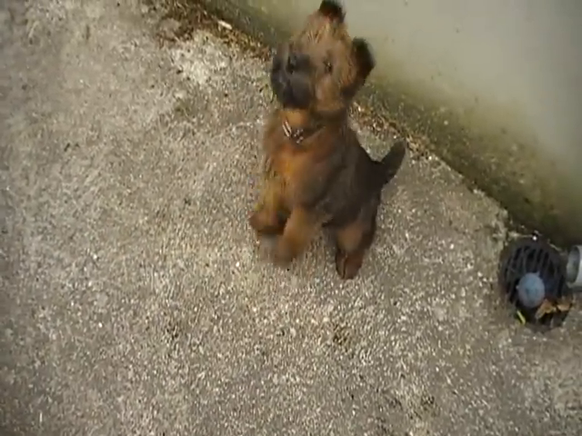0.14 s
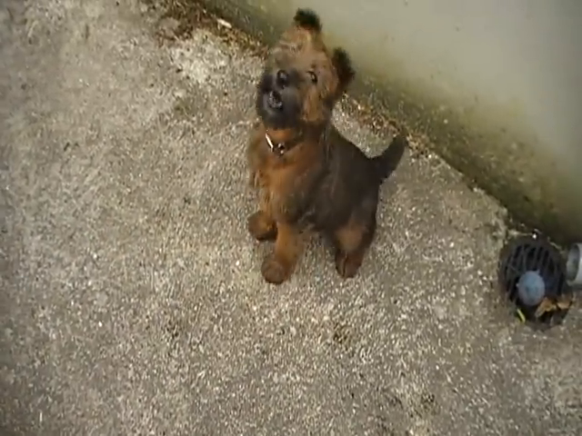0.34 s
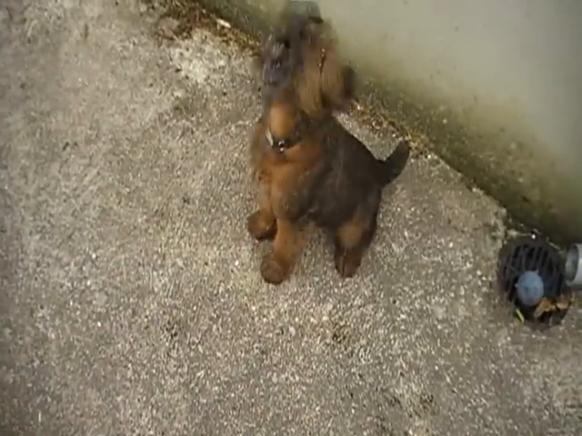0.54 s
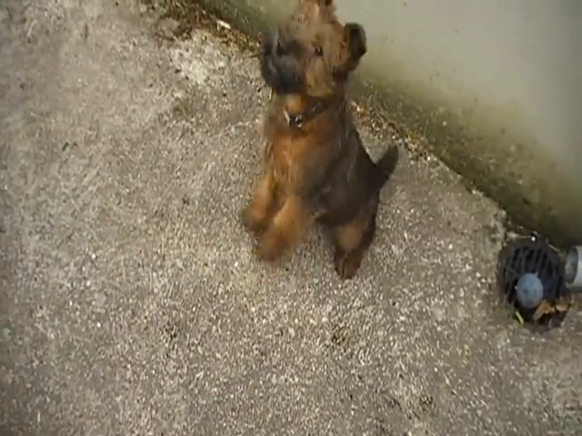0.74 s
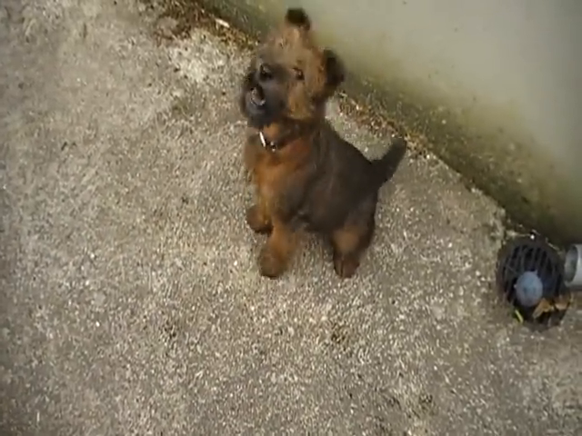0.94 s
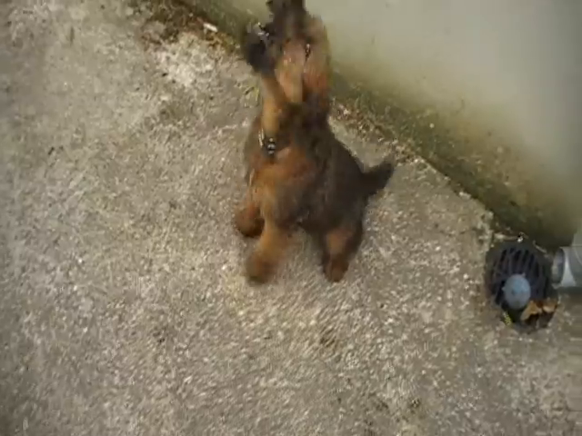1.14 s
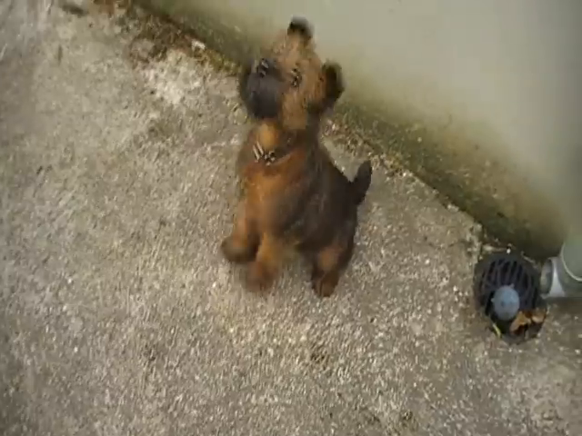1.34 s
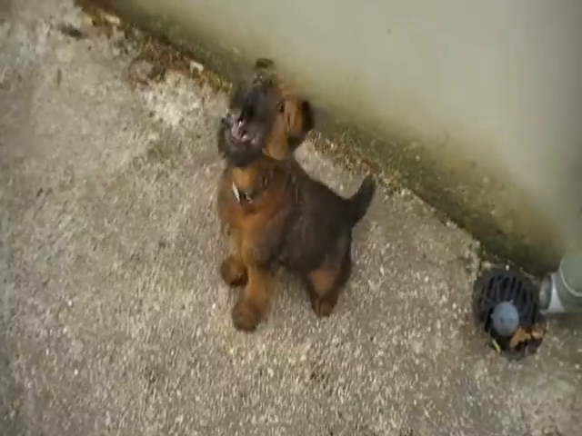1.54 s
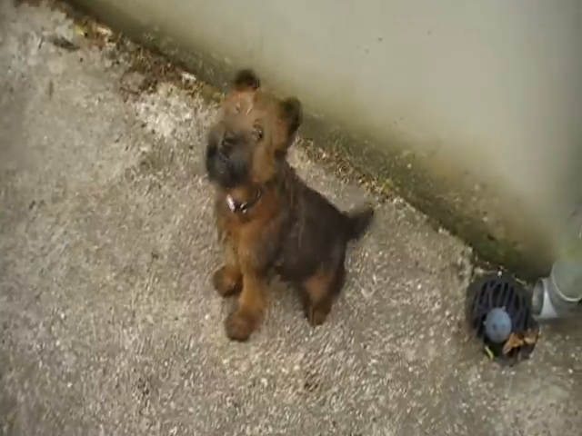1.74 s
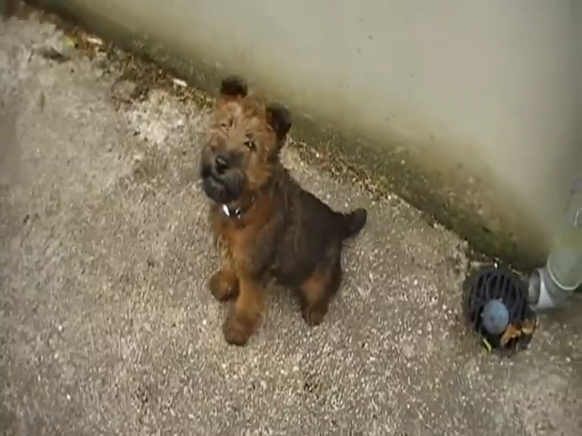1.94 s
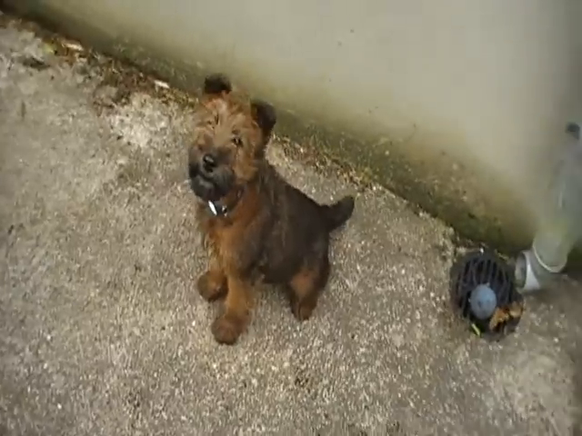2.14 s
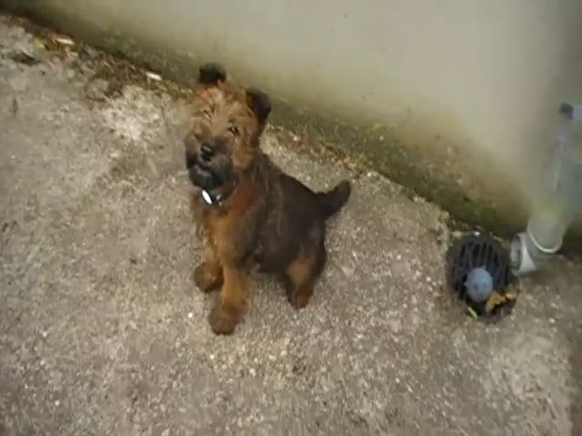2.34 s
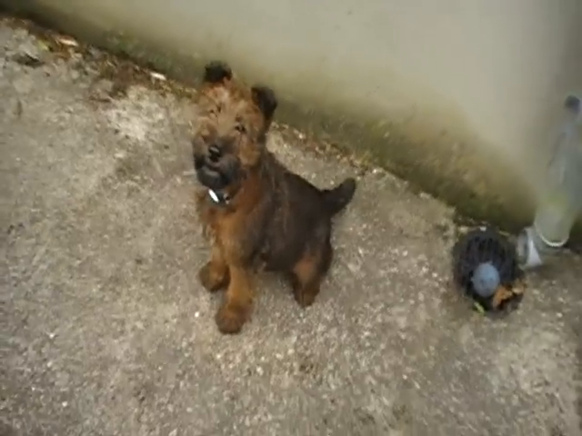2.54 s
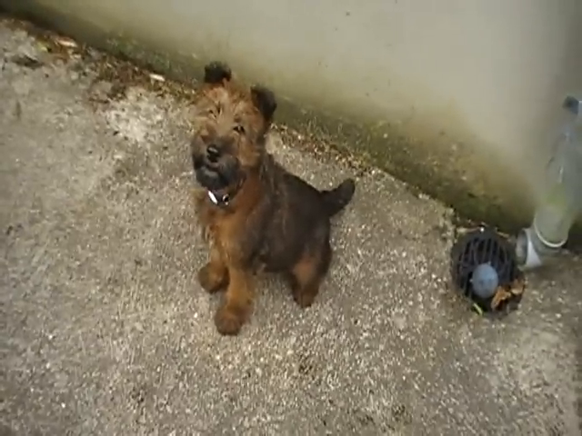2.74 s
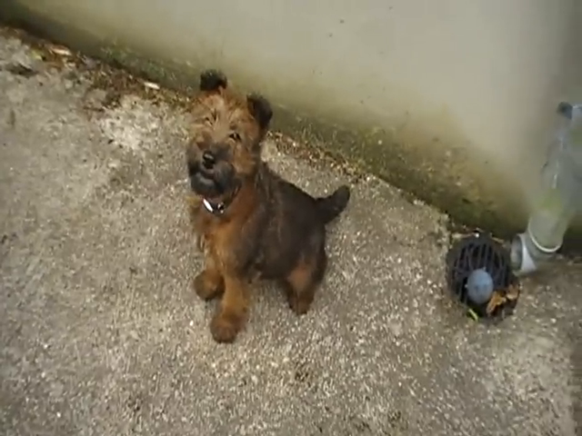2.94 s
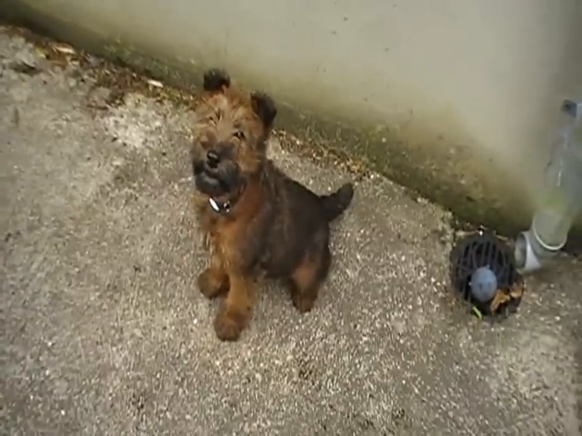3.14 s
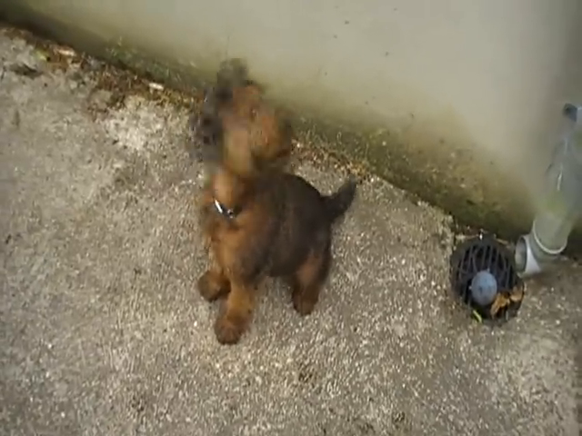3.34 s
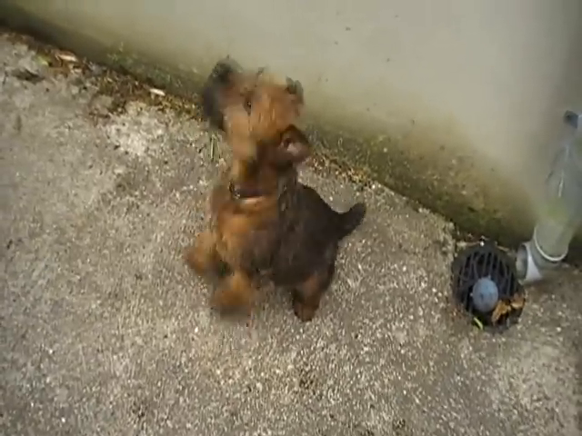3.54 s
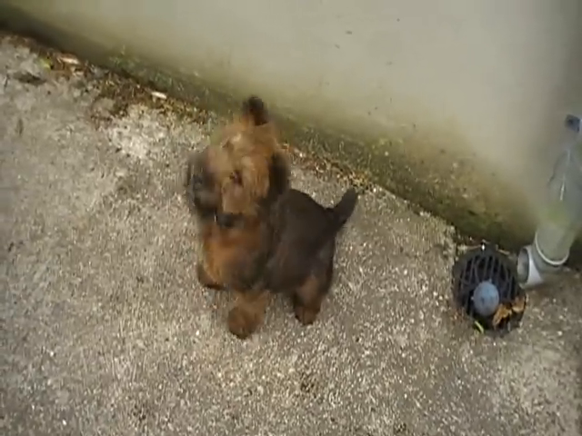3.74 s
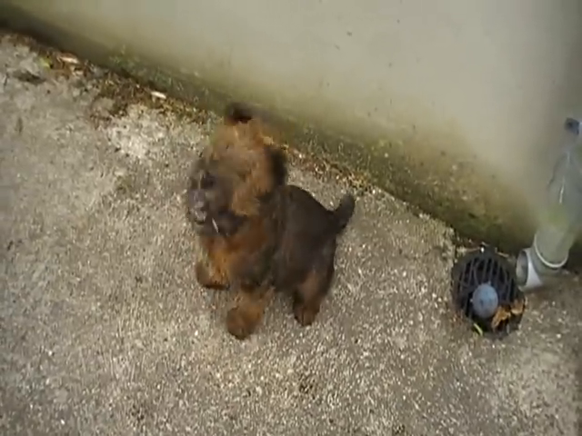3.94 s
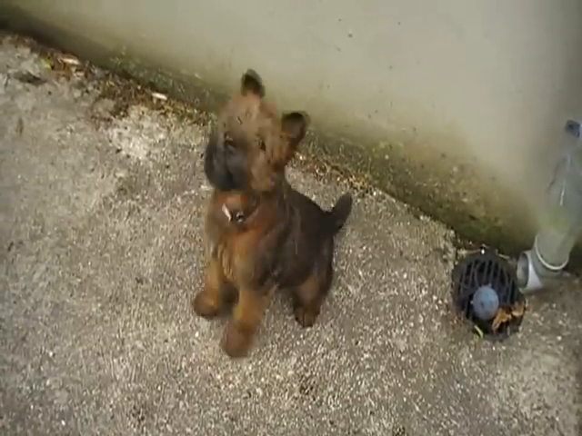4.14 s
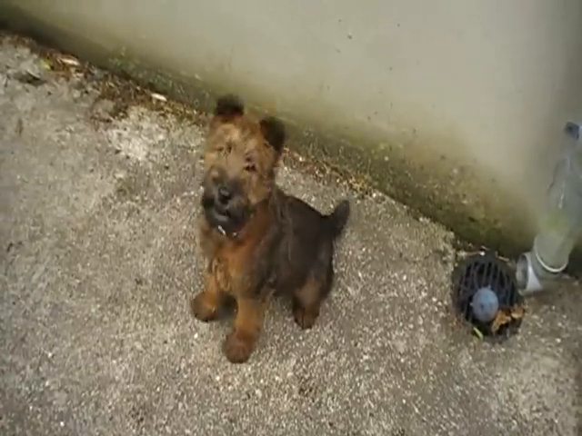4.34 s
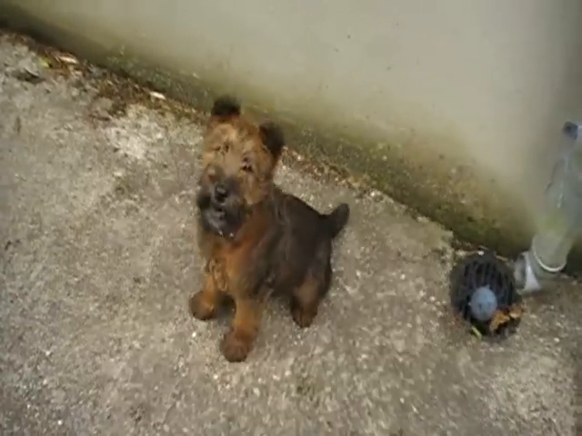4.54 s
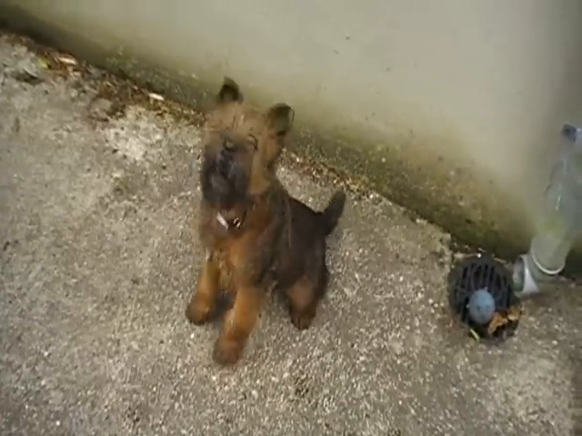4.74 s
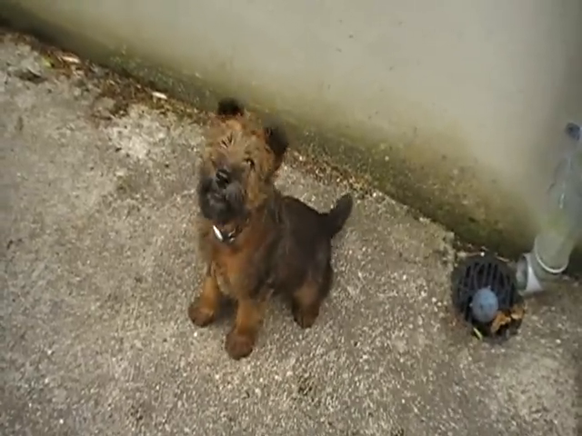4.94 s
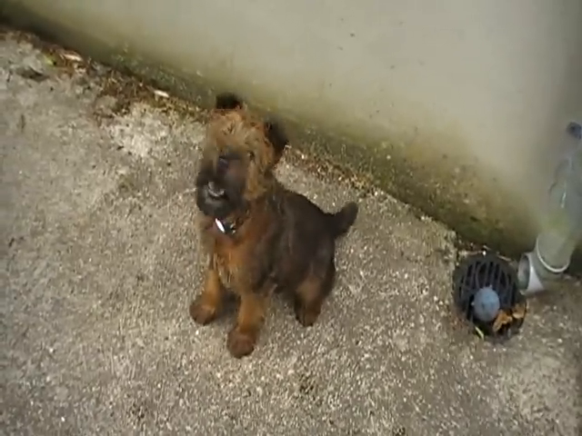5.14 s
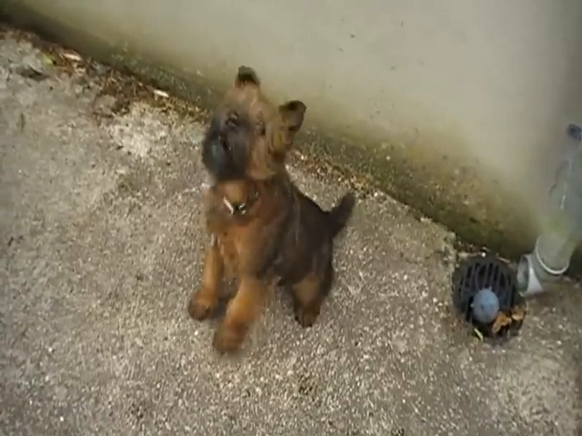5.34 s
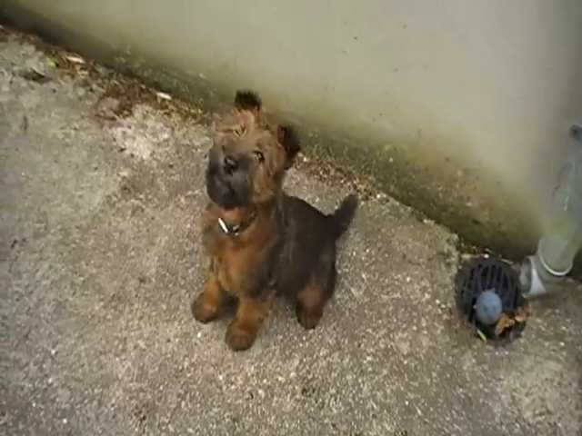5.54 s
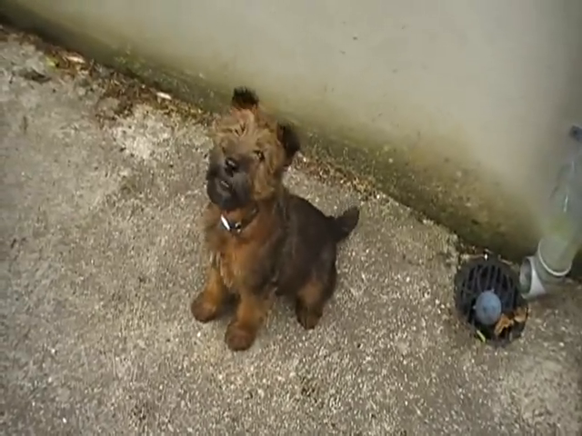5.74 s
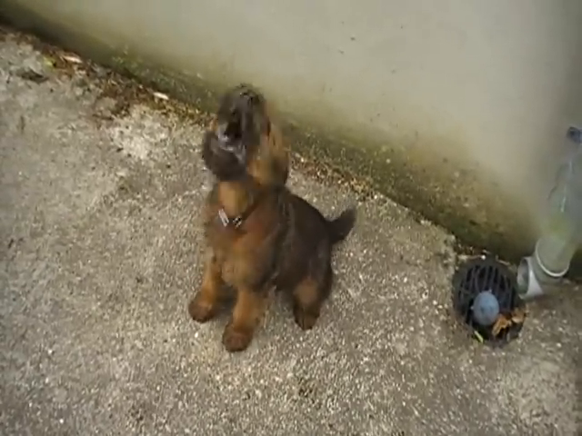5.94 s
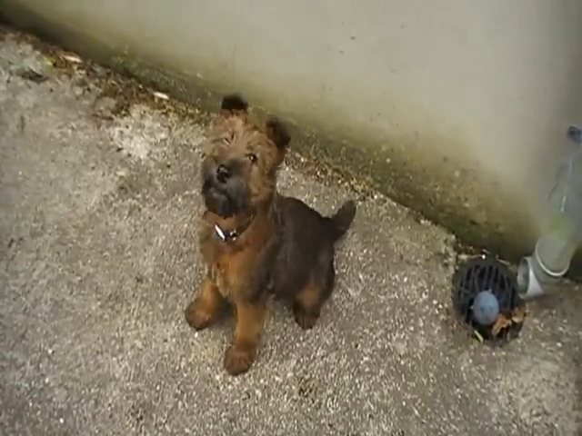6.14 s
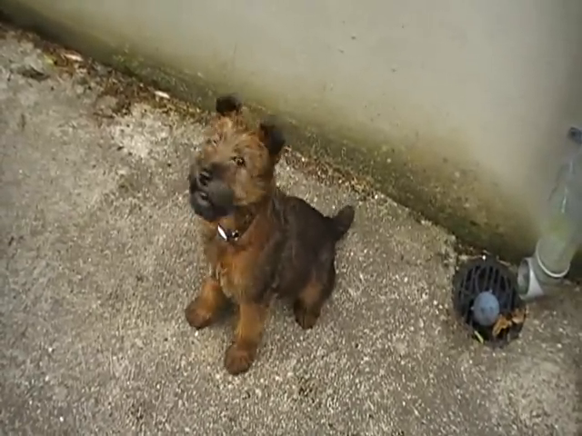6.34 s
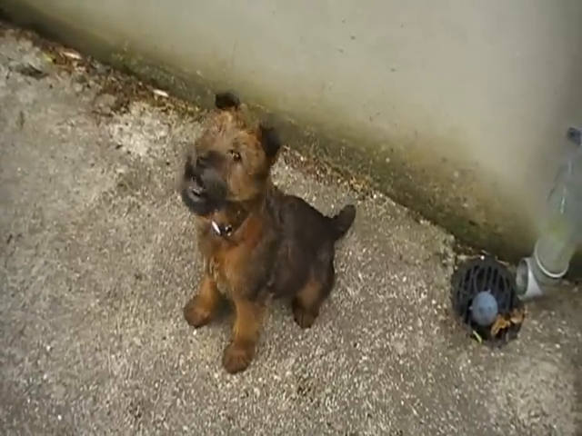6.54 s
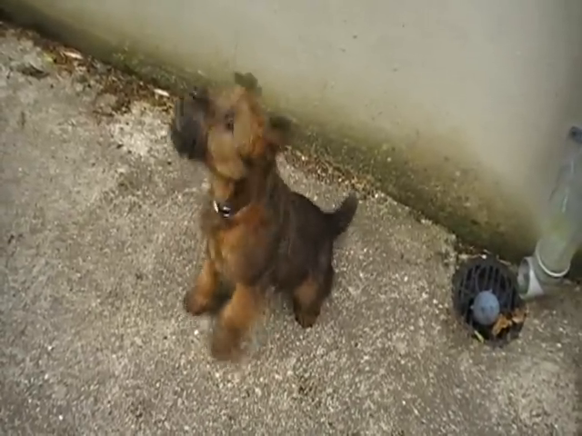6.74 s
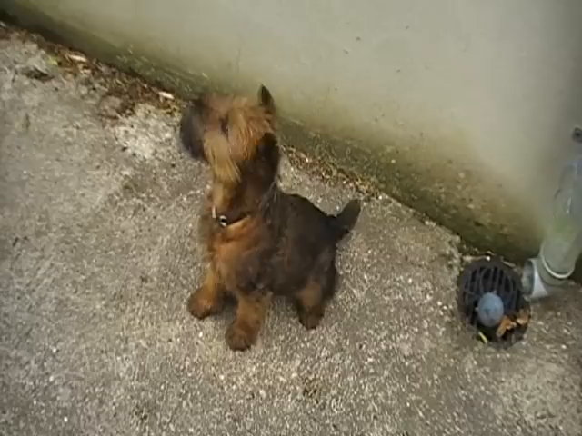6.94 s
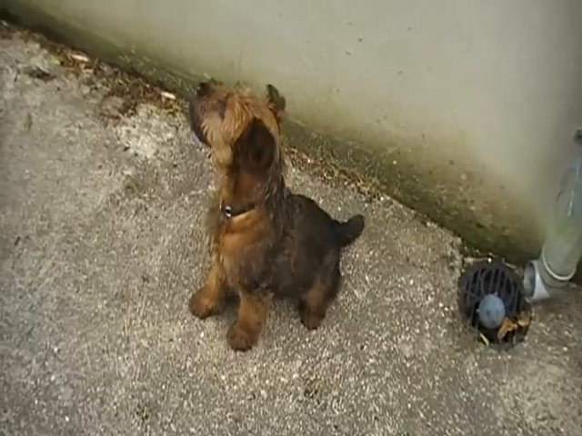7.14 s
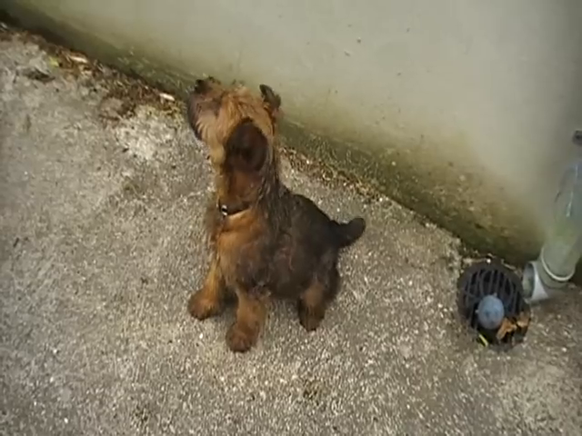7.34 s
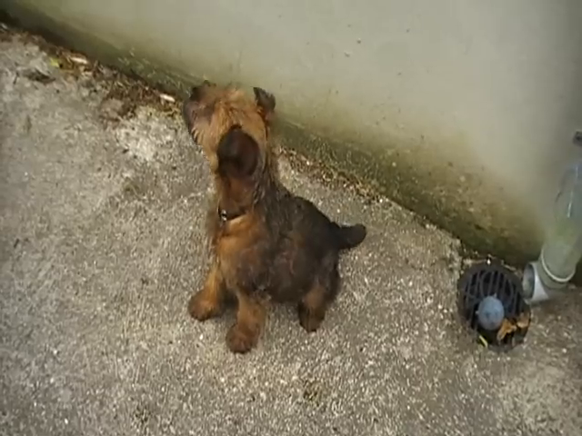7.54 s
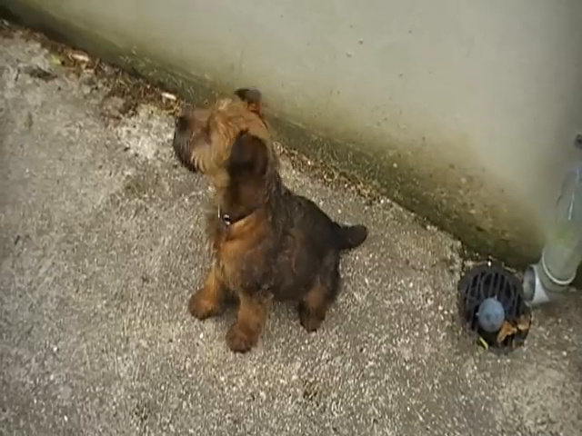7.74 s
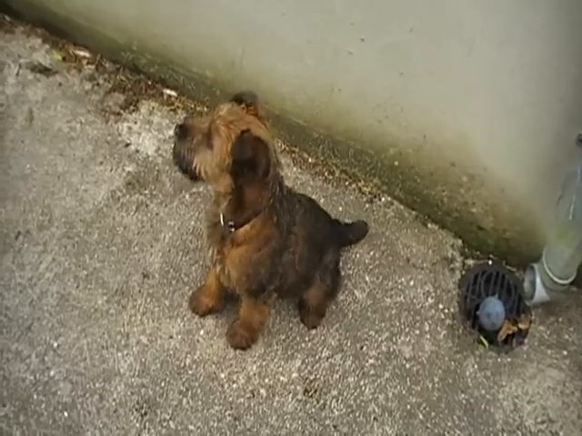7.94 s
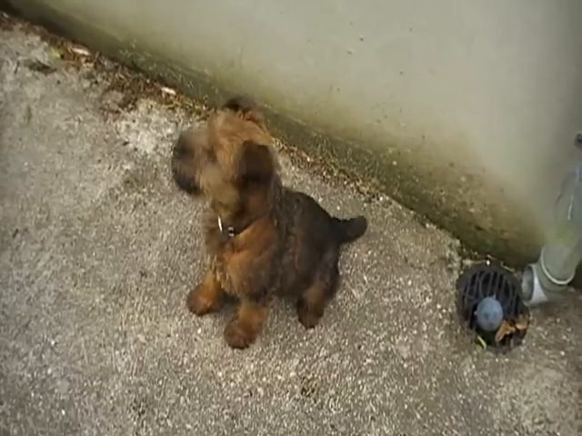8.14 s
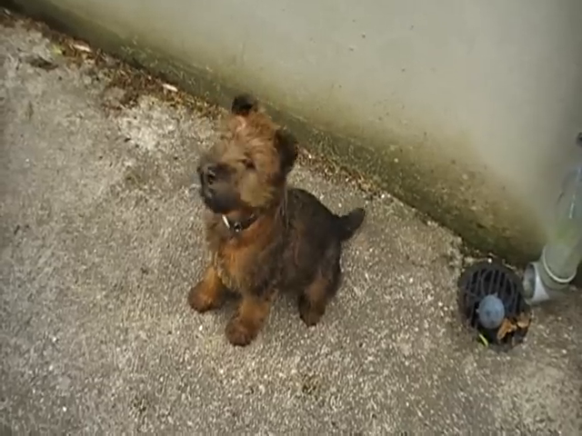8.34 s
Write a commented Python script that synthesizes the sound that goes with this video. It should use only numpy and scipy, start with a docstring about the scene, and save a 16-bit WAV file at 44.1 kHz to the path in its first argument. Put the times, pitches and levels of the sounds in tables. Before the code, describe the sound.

A small puppy yaps nine times, high and hoarse, in a concrete yard, with one drawn-out yelp, faint sniffs and light wind bumps.

```python
"""Puppy yapping in a yard

A puppy yaps nine times on a concrete yard beside a wall; the third yap draws out into a long tail, and a yelp
follows at once. Each yap is a stack of partials that squeals, turns hoarse and falls in pitch; echoes and faint
ringing follow. Sniffs are shaped noise, and near the end come a click and a thin whistle made of a sine and its
octave. Low wind gusts and a steady outdoor wash are filtered noise. A limiter ducks the yaps."""
import sys
import numpy as np
from scipy import signal
from scipy.fft import rfft, irfft
from scipy.io import wavfile
from scipy.ndimage import uniform_filter1d

SR = 44100
rng = np.random.default_rng(int(sys.argv[2]) if len(sys.argv) > 2 else 0)


def digitize_waveform(pressure):
    """Quantize a signal to 16-bit integers and store it at the path in sys.argv[1].

    Rows of a 2-D input are taken as channels; values are limited to [-1, 1].
    """
    field = np.atleast_2d(pressure).T
    bounded = np.clip(field, -1, 1)
    quanta = np.round(bounded * 32767).astype(np.int16)
    wavfile.write(sys.argv[1], SR, quanta)


N = 373527

# The yaps: a clean squeal, a hoarse stretch, a loud ring as the pitch steps down onto the throat's main
# resonance, then a drop into a low tail. Each row: start in seconds; then, in seconds after the start,
# end of squeal, ring, drop into the tail, end; then pitch in Hz at the onset, end of squeal, hoarse stretch,
# early tail, late tail; then effort in dB of the opening kick, squeal and ring, hoarse stretch, tail;
# pressing (extra strength) of the squeal's overtones in dB, tail roughness 0-1, treble beamed forward in dB.
YAPS = [(0.002, 0.014, 0.058, 0.12, 0.2, 1297, 1301, 1096, 457, 434, 8, -5.5, -9, -22, -16.5, 0.45, 3),
        (0.613, .024, .11, 0.15, 0.27, 1087, 1175, 1206, 679, 611.6, 0.5, -2.5, -11.5, -22, -3, 0.2, 1.5),
        (1.171, 0.0334, .119, .17, .3, 1038, 1156, 1115, 686.5, 670, 0, -2, -14, -14, -6, 0.097, 4.5),
        (3.461, 0.025, .106, 0.12, 0.22, 1492, 1610, 1339, 510.3, 399.4, -0.5, -4, -9.5, -20.5, -4.5, 0.39, -4.5),
        (4.057, 0.028, .11, 0.14, 0.23, 1254, 1161, 1130, 701, 574.4, -4, -2, -13.5, -16.5, -9.5, 0.25, 2),
        (4.679, .02, 0.13, 0.17, 0.28, 772, 893.6, 1332, 591, 549.5, -32, -2.5, -9.5, -19, 8.5, 0.09, 2),
        (5.282, .024, 0.096, .143, 0.32, 992, 1090, 1234, 710, 558, 6.5, -0.5, -13.5, -17, -2.5, 0.07, 2.5),
        (5.967, 0.019, 0.13, 0.17, 0.24, 875, 894, 1265, 569, 352, -27, -1.5, -10.5, -15, 5.5, 0.18, 1.5),
        (6.686, 0.024, 0.13, 0.15, 0.23, 846, 892, 1328, 423.4, 426, -2.5, -4, -8, -21.5, 9.5, 0.31, -3.5)]
# The third yap's drawn-out tail and then, from about 1.54 s, a fresh yelp that follows it at once. Each row:
# time in seconds, pitch in Hz, roughness 0-1, # effort in dB, pressing of the overtones in dB.
YELP = [(1.371, 658, 0.03, -16.5, -10), (1.447, 664.7, 0, -16.5, -3.5), (1.462, 603, 0, -11, -15),
        (1.478, 676, 0.04, -13, -5.5), (1.499, 601, 0, -12.5, -15), (1.515, 653.4, 0, -9, 0),
        (1.535, 549.6, 0.25, -15.5, -18.5), (1.558, 645.7, 0.21, -9, -7.5), (1.599, 720.7, 0, -15, 3),
        (1.626, 934, 0.07, -2.5, -12.5), (1.659, 1036, 0, -4.5, -6.5), (1.7, 933, 0.08, -6, 5.5),
        (1.744, 901.6, 0.05, -9.5, -11), (1.78, 666, 0.15, -13, 0.5), (1.822, 536, 0, -14.5, -17),
        (1.848, 463.3, 0.19, -26, -44)]
# The mouth narrows as the yelp climbs. Each row: pitch in Hz, mouth brightness in dB.
YELP_MOUTH = [(650, -0.5), (930, -5)]
# Throat and muzzle response. Each row: frequency in Hz, level in dB.
THROAT = [(250, -27), (450, -15.5), (530, -7), (620, -8), (750, -5), (960, 8.5), (1300, 1.5), (1560, -2),
          (1800, -2.5), (2300, -7), (2650, -10.5), (3000, -16.5), (3900, -19), (4900, -36.5), (6400, -35),
          (7200, -30.5), (10500, -30.5), (14000, -57)]
# How strongly mouth brightness acts on each region. Each row: frequency in Hz, multiplier of the brightness.
MOUTH = [(2400, 0.086), (3300, 1.84), (6000, 3), (7600, 0.18)]
# The puppy's sniffs and puffs. Each row: start, peak and end in seconds, peak level in dB,
# pitch of the nose hiss in Hz.
SNIFFS = [(0.335, 0.393, .6, -46, 3650), (0.953, 1.084, 1.17, -35, 4340), (3.635, 3.693, 3.8, -35.5, 8300),
          (3.856, 3.993, 4.03, -36.5, 2560), (5.067, 5.228, 5.26, -35, 4600),
          (5.83, 5.898, 5.94, -42, 4840), (8.248, 8.358, 8.85, -41.5, 8900)]
# Colour of air through the muzzle. Each row: frequency in Hz, level in dB.
SNIFF_COLOUR = [(400, -55), (900, -3.5), (1400, 7.5), (2000, -5), (2700, -3), (5500, -4), (7500, -12.5),
                (10500, -13.5), (14500, -36)]
# The thin closing whistle, which steps down once. Each row: time in seconds, pitch in Hz, level in dB.
WHISTLE = [(8.251, 6100, -51), (8.263, 5970, -27.5), (8.283, 6010, -33), (8.304, 5750, -47),
           (8.314, 5140, -29), (8.33, 5160, -40), (8.352, 5040, -50)]
# First reflections from ground and wall. Each row: delay in seconds, gain on the left, gain on the right.
ECHOES = [(.0051, 0.1, 0.02), (0.0126, -0.45, -0.12)]
# Diffuse echo of the yard. Each row: frequency in Hz, time to fade by 60 dB in seconds.
YARD_DECAY = [(300, 0.06), (800, 0.32), (2100, 0.23), (5500, 0.28), (12000, 0.19)]
# Ringing between the walls. Each row: frequency in Hz, relative level in dB, time to fade by 60 dB in seconds.
YARD_MODES = [(358, -17, 0.66), (511, -14.5, 0.39), (667, -19.5, 0.74), (848, -7.5, 0.41)]
# Left-right balance of puppy and air. Each row: frequency in Hz, left minus right in dB.
BALANCE = [(80, 0.5), (300, 4.5), (1200, 3), (2300, 3), (4200, 0), (7600, 1.5), (13000, 7)]
# Gusts on the microphone. Each row: time of the peak in seconds, peak level in dB,
# time constant of both swell and fade in seconds.
GUSTS = [(1.53, -24.5, 0.077), (1.81, -26.5, .09), (2.08, -34, 0.11), (2.54, -23.5, 0.021),
         (2.95, -44.5, 0.4), (5.47, -36, 0.06), (6.969, -14.5, 0.018), (7.12, -36.5, 0.2),
         (8.03, -32, 0.04), (8.45, -40, 0.32)]
# Colour of the wind. Each row: frequency in Hz, level in dB.
WIND_COLOUR = [(15, -18), (35, 0), (70, 2.5), (130, -0.5), (200, -5.5), (350, -23), (800, -42), (3000, -90)]
# Colour of the steady outdoor background. Each row: frequency in Hz, relative level in dB.
AIR = [(18, -53), (30, -14), (112, -11.5), (243, -1.5), (555, -8), (796, -7.5), (1060, -11.5),
       (1600, -11.5), (3560, -20), (6610, -22.5), (9490, -27), (14400, -46)]
# How alike the background is in both ears. Each row: frequency in Hz, left-right likeness.
AIR_LIKENESS = [(60, 0.3), (300, 0.89), (1000, 0.84), (3000, 0.79), (8000, 0.62)]

AIR_DB = -42
CALM_DB = -66.5  # wind between the gusts
EDGE_HZ = 14500  # upper limit of the sound

# How long the voice takes to pass from stage to stage, in seconds
KICK_S, BREAK_S, SETTLE_S, STEP_S = 0.00778, 0.013, 0.02, 0.01198
SWELL_S, DROP_S, DIE_S = 0.012, 0.009, 0.042
# Pitch on the way into the ring, at it and out of it
APPROACH_HZ, RING_HZ, LEAVE_HZ = 1011.7, 967, 891.4
LAST_PITCH = 0.8  # share of the late tail pitch left as the voice dies
FIRST_LEAP = 0.7  # share of the way to the hoarse pitch that the voice jumps as it breaks
# Relative to the squeal's effort: dip after the kick, break, ring, end of ring
DIP_DB, BREAK_DB, RING_DB, LEAVE_DB = -2.5, -7, 0, -10.5
SETTLE_DB, SWELL_DB = 2, 0  # both ends of the hoarse stretch, relative to its effort
# A clean tail blooms late; per unit of roughness it fades, dulls and loses its fundamental
BLOOM_DB, SLACK_DB = 5, 26
DIE_DB = -13  # fall of the tail at its very end
# The squeal: roughness (0-1) at the kick and after it, extra pressing at the kick, wide-open mouth brightness
KICK_ROUGH, SQUEAL_ROUGH, KICK_PRESS_DB, SQUEAL_MOUTH_DB = 0.27, 0.075, 7, 4.5
# Colour of the later stages: roughness 0-1, pressing of the overtones in dB, mouth brightness in dB
BREAK, HOARSE = (0.75, 0.67, -3.1), (0.44, -4, -25.5)
RING, LEAVE = (0.19, -5, -5.5), (0.11, -1.5, -5.5)
# The tail relaxes toward a purer tone: pressing in dB and mouth brightness in dB, before slackness is counted
EARLY_TAIL, LATE_TAIL, LAST_TAIL = (0, -1.1), (-19.5, 5.7), (-43, 2.7)
# The throat's second resonance climbs as the jaw closes: wide open, at the ring, in the tail; and in the yelp
OPEN_JAW_HZ, RING_JAW_HZ, TAIL_JAW_HZ, YELP_JAW_HZ = 1690, 1800, 2450, 1790
JAW_PEAK_DB, JAW_WIDTH_HZ = 5, 237
SHIMMER_DB, SHIMMER_RATE_HZ = 5.5, 42  # a hoarse voice sputters in loudness; strength is per unit of wobble


def amp(db):
    """Turns decibels into gain."""
    return 10 ** (np.asarray(db) / 20)


def unit(x):
    """Scales a sound to an average (rms) strength of 1."""
    return x / np.sqrt(np.mean(abs(x) ** 2) + 1e-20)


def read(points, hz):
    """Reads a table between its rows, on a log-frequency axis."""
    f, value = np.transpose(points)
    return np.interp(np.log(hz + 1), np.log(f + 1), value)


def bins(size):
    """Frequencies in the spectrum of that many samples."""
    return np.fft.rfftfreq(size, 1 / SR)


def curves(rows):
    """Gives the sample times, and every column joined by straight lines."""
    s, *columns = np.transpose(rows)
    t = np.arange(s[0], s[-1], 1 / SR)
    return t, *(np.interp(t, s, c) for c in columns)


def add(mix, s, sound):
    """Mixes a sound in at s seconds."""
    part = mix[max(round(s * SR), 0):][:len(sound)]
    part += sound[:len(part)]


def noise(gain, size):
    """Noise of rms 1, coloured by a gain for each frequency."""
    return unit(irfft(rfft(rng.standard_normal(size)) * gain, size))


def flutter(size, rate_hz):
    """Complex random wobble of rms 1, mostly slower than the rate."""
    sos = signal.butter(2, rate_hz, fs=SR, output="sos")
    raw = rng.standard_normal(size) + 1j * rng.standard_normal(size)
    return unit(signal.sosfilt(sos, raw))


def stages(start, squeal_s, ring_s, drop_s, end_s, onset_hz, crest_hz, hoarse_hz, early_hz, late_hz,
           kick_db, effort_db, hoarse_db, tail_db, press_db, tail_rough):
    """Plots the course of one yap as the throat squeals, breaks, rings and goes slack."""
    break_s, swell_s = squeal_s + BREAK_S, ring_s - SWELL_S
    slack_db = SLACK_DB * tail_rough
    slack = np.array([slack_db, -slack_db])
    late_db = tail_db + BLOOM_DB - slack_db
    leap_hz = crest_hz + FIRST_LEAP * (hoarse_hz - crest_hz)
    # Each row: seconds, pitch in Hz, effort in dB, roughness, pressing in dB, mouth brightness in dB,
    # second resonance in Hz
    rows = np.array([
        (0, onset_hz, kick_db, KICK_ROUGH, press_db + KICK_PRESS_DB, 0, OPEN_JAW_HZ),
        (KICK_S, (onset_hz + crest_hz) / 2, effort_db + DIP_DB, SQUEAL_ROUGH, press_db,
         SQUEAL_MOUTH_DB, OPEN_JAW_HZ),
        (squeal_s, crest_hz, effort_db, SQUEAL_ROUGH, press_db, SQUEAL_MOUTH_DB, OPEN_JAW_HZ),
        (break_s, leap_hz, effort_db + BREAK_DB, *BREAK, OPEN_JAW_HZ),
        (break_s + SETTLE_S, hoarse_hz, hoarse_db + SETTLE_DB, *HOARSE, OPEN_JAW_HZ),
        (swell_s - STEP_S, (hoarse_hz + APPROACH_HZ) / 2, hoarse_db, *HOARSE, OPEN_JAW_HZ),
        (swell_s, APPROACH_HZ, hoarse_db + SWELL_DB, *HOARSE, OPEN_JAW_HZ),
        (ring_s, RING_HZ, effort_db + RING_DB, *RING, RING_JAW_HZ),
        (drop_s - DROP_S, LEAVE_HZ, effort_db + LEAVE_DB, *LEAVE, (RING_JAW_HZ + TAIL_JAW_HZ) / 2),
        (drop_s, early_hz, tail_db, tail_rough, EARLY_TAIL[0], EARLY_TAIL[1] - slack_db, TAIL_JAW_HZ),
        (end_s - DIE_S, late_hz, late_db, tail_rough, *(LATE_TAIL + slack), TAIL_JAW_HZ),
        (end_s, late_hz * LAST_PITCH, late_db + DIE_DB, tail_rough, *(LAST_TAIL + slack), TAIL_JAW_HZ)])
    # a short yap cuts its earlier stages short
    rows[:, 0] = start + np.minimum.accumulate(rows[::-1, 0])[::-1]
    return rows


def drawn_out(rows):
    """Lets a yap still sounding when the YELP table begins run on into its long tail and the yelp after it."""
    begin = YELP[0][0]
    if not rows[0, 0] < begin < rows[-1, 0]:
        return rows
    yelp = [(s, hz, db, rough, press_db, read(YELP_MOUTH, hz), YELP_JAW_HZ)
            for s, hz, rough, db, press_db in YELP]
    return np.vstack([rows[rows[:, 0] < begin], yelp])


def yap(rows, facing_db, jitter=0.025, smear=1, smear_hz=160, burst=0.31, burst_s=0.014, attack_s=0.00323):
    """Vocal folds drive partials through the throat; hoarse beats alternate in strength and blur the tone."""
    t, hz, effort_db, rough, press_db, mouth_db, jaw_hz = curves(rows)
    size = len(t)
    rough = np.clip(rough, 0, 1)
    hz = hz * (1 + jitter * (rough + 0.48) * flutter(size, 115).real)
    phase = 2 * np.pi * np.cumsum(hz) / SR
    opening = burst * np.exp(-(t - t[0]) / burst_s)  # the folds blow apart with a raspy burst
    voice, power = np.zeros(size), np.zeros(size)
    # k counts partials in half steps: whole numbers are harmonics
    for k in np.arange(1, min(2 * EDGE_HZ / hz.min(), 48)) / 2:
        f = k * hz
        overtone = k > 1
        beam = np.clip((f - 5500) / 1500, 0, 1)
        jaw_db = JAW_PEAK_DB * np.exp(-((f - jaw_hz) / JAW_WIDTH_HZ) ** 2)
        mouth_lift_db = mouth_db * read(MOUTH, f)
        gain = amp(read(THROAT, f) + jaw_db + press_db * overtone + mouth_lift_db + facing_db * beam)
        hoarse = np.clip(rough + overtone * opening, 0, 1)
        if k % 1:  # period doubling puts lines between the harmonics
            gain = gain * 0.9 * hoarse
        blur = np.clip(smear * hoarse * min(k, 2.5), 0, 1)  # overtones lose their pitch first
        chaos = flutter(size, smear_hz * min(k, 1.5))
        chaos = chaos + (0.25 + opening) * overtone * flutter(size, 500)
        # each overtone flickers in strength at random, so the partials sound uneven
        gain = gain * amp(np.clip(1.2 * (k - 1), 0, 5) * flutter(size, 35).real)
        tone = (np.sqrt(1 - blur ** 2) + blur * chaos) * np.exp(1j * k * phase)
        voice += gain * tone.real
        power += gain ** 2 / 2
    fade_in = np.clip((t - t[0]) / attack_s, 0, 1)
    fade_out = np.clip((t[-1] - t) / 0.012, 0, 1)
    shimmer_db = SHIMMER_DB * rough * flutter(size, SHIMMER_RATE_HZ).real
    # dividing by the partials' power leaves the loudness to the effort curve
    return t[0], amp(effort_db + shimmer_db) * fade_in * fade_out * voice / np.sqrt(power)


def sniff(start, peak, end, db, hz, nose_db=8, edge_db=-13):
    """Air hisses through the muzzle, with one broad resonance in the nose."""
    t, level_db = curves([(start, edge_db), (peak, 0), (end, edge_db)])
    f = bins(len(t))
    nose = np.exp(-(np.log((f + 1) / hz) / 0.25) ** 2)
    hiss = noise(amp(read(SNIFF_COLOUR, f) + nose_db * nose), len(t))
    return start, amp(db + level_db) * hiss * signal.windows.tukey(len(t), 0.2)


def tick(s=8.206, db=-33, decay_s=0.0017):
    """One small click just before the whistle: noise that dies away at once."""
    t = np.arange(SR // 50) / SR
    return s, amp(db) * np.exp(-t / decay_s) * rng.standard_normal(len(t))


def whistle(octave_db=-11, waver=0.0084):
    """A nearly pure, wavering whistle whose octave fades as the pitch drops."""
    t, hz, db = curves(WHISTLE)
    wavering_hz = hz * (1 + waver * flutter(len(t), 300).real)
    phase = 2 * np.pi * np.cumsum(wavering_hz) / SR
    octave = amp(octave_db) * np.clip((hz - 5200) / 500, 0, 1)
    return t[0], amp(db) * np.sqrt(2) * (np.sin(phase) + octave * np.sin(2 * phase))


def yard(x, build_s=0.013, likeness=0.89):
    """Direct sound, first reflections, a diffuse tail that builds up as the walls answer, and ringing modes."""
    t = np.arange(SR) / SR
    shared, *own = rng.standard_normal((3, SR))
    likeness = np.clip(likeness, 0, 1)
    scatter = np.sqrt(likeness) * shared + np.sqrt(1 - likeness) * np.array(own)
    # each frequency of the scattered noise fades at its own speed
    hz, age, z = signal.stft(scatter, SR, nperseg=256)
    fade = amp(-60 * age / read(YARD_DECAY, hz)[:, None])
    tail = signal.istft(z * fade, SR)[1][:, :SR]
    tail *= np.clip(t / build_s, 0, 1)
    response = amp(-9.5) * tail / np.linalg.norm(tail[0])
    response[:, 0] += 1  # direct sound
    for delay, *gains in ECHOES:
        response[:, round(delay * SR)] += gains
    for hz, db, t60 in YARD_MODES:
        response += amp(db - 60 * t / t60) * np.sin(2 * np.pi * hz * t) * 200 / SR
    return signal.fftconvolve(x[None], response, axes=1)[:, :N]


def wind(right_gain=-1.29, left_gain=1.0, eddy=0.46):
    """Gusts push the two microphone ports in opposite directions, with separate eddies at each."""
    colour = amp(read(WIND_COLOUR, bins(N)))
    t = np.arange(N) / SR
    gusts = amp(CALM_DB) + sum(amp(db) * np.exp(-abs(t - s) / swell_s) for s, db, swell_s in GUSTS)
    push = noise(colour, N)
    return gusts * np.array([side * push + eddy * noise(colour, N) for side in (left_gain, right_gain)])


def air(swell_db=-1.0):
    """Distant outdoor wash: noise mostly alike in both ears, swelling slightly."""
    hz = bins(N)
    left, other = rfft(rng.standard_normal((2, N)))
    same = np.clip(read(AIR_LIKENESS, hz), -1, 1)
    right = same * left + np.sqrt(1 - same ** 2) * other
    pair = irfft(np.array([left, right]) * amp(read(AIR, hz)), N)
    return amp(AIR_DB + swell_db * flutter(N, 6.9).real) * unit(pair)


def scene():
    """The puppy in its yard, a little to the left, over air and wind."""
    puppy = np.zeros(N)
    for *shape, facing_db in YAPS:
        add(puppy, *yap(drawn_out(stages(*shape)), facing_db))
    for row in SNIFFS:
        add(puppy, *sniff(*row))
    add(puppy, *whistle())
    add(puppy, *tick())
    lean = amp(np.outer([0.5, -0.5], read(BALANCE, bins(N))))
    placed = irfft(rfft(yard(puppy) + air()) * lean, N)
    return placed + wind()


def record(dry, threshold_db=-8.0, recovery_db_per_s=24, slope=0.79, attack_s=0.0008):
    """A limiter led by the left side ducks fast and recovers slowly; peaks that slip past clip; treble is cut."""
    power_db = 10 * np.log10(abs(uniform_filter1d(dry[0] ** 2, size=100)) + 1e-12)
    # hold each peak, letting it sink at the recovery speed
    fall = np.arange(N) / SR * recovery_db_per_s
    held_db = np.maximum.accumulate(power_db + fall) - fall
    over_db = np.maximum(held_db - threshold_db, 0)
    keep = np.exp(-1 / (attack_s * SR))
    smooth_over_db = signal.lfilter([1 - keep], [1, -keep], over_db)
    ducked = dry * amp(-slope * smooth_over_db)
    low_pass = signal.firwin(255, EDGE_HZ, window=("kaiser", 8), fs=SR)
    return signal.oaconvolve(np.clip(ducked, -1, 1), low_pass[None], "same", axes=1)


dry = scene()
out = record(dry)
digitize_waveform(out)
```